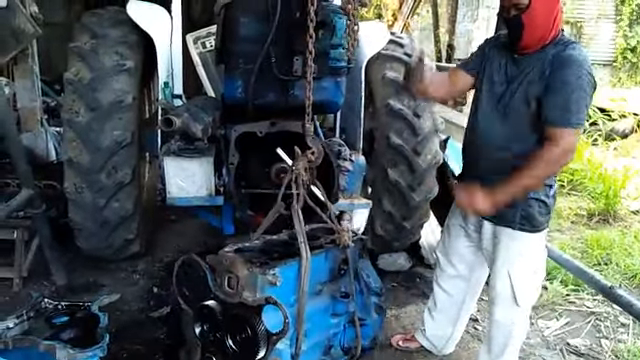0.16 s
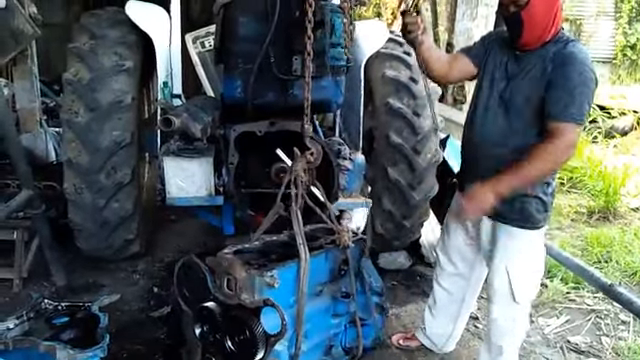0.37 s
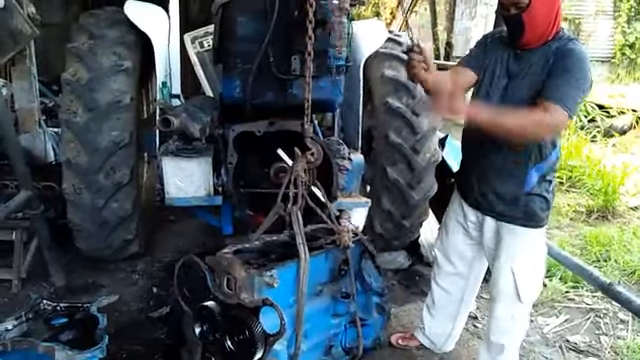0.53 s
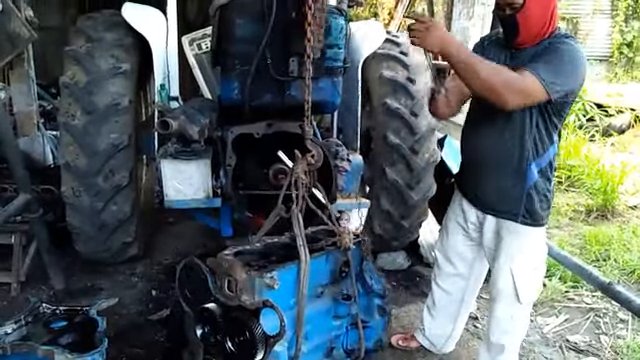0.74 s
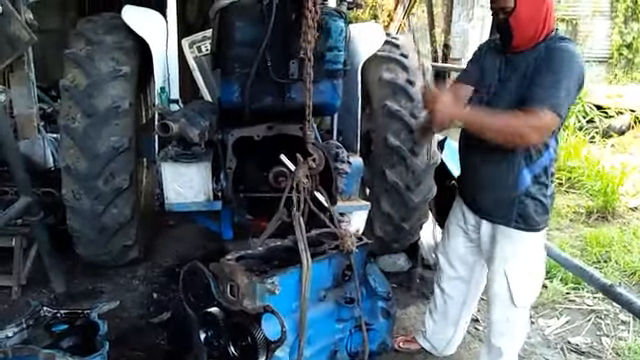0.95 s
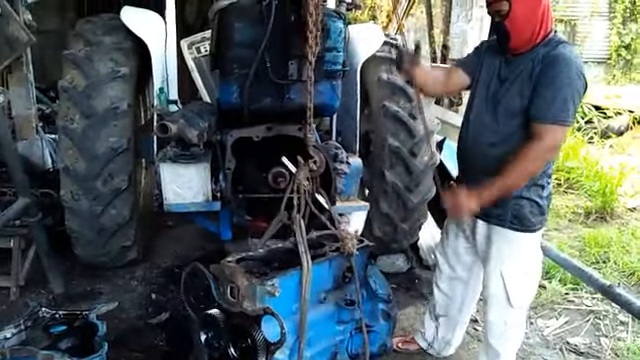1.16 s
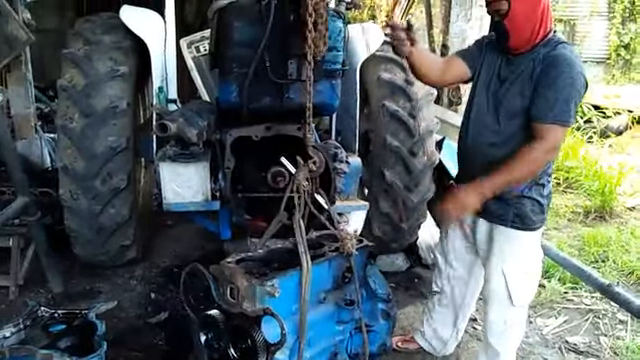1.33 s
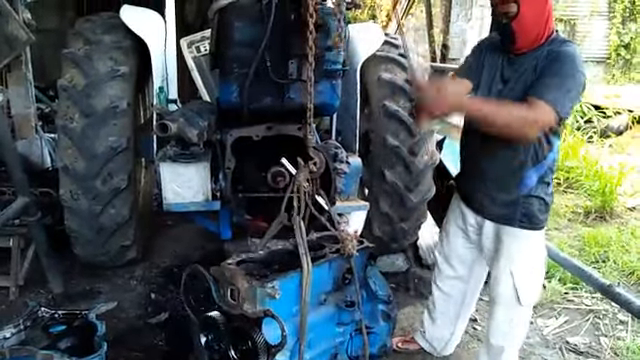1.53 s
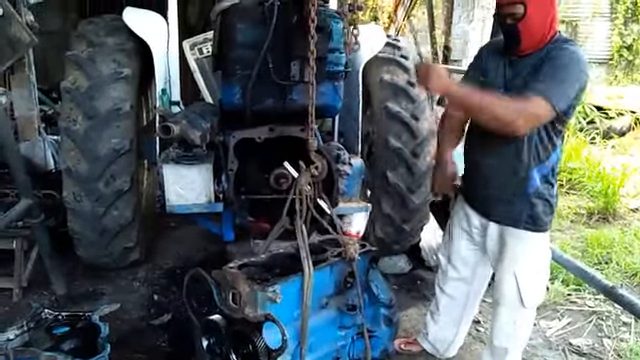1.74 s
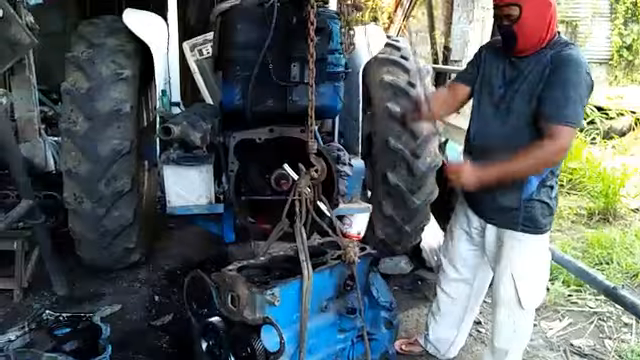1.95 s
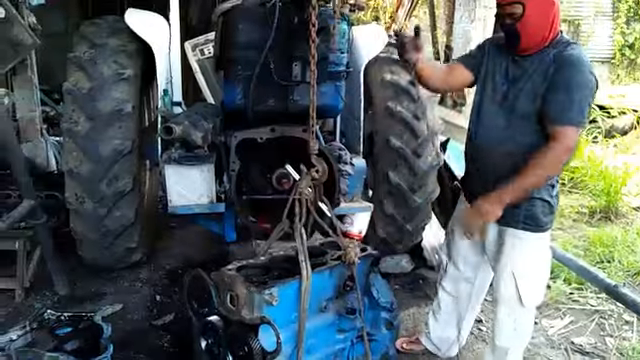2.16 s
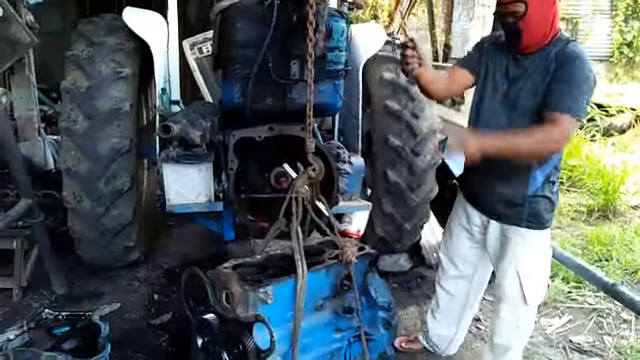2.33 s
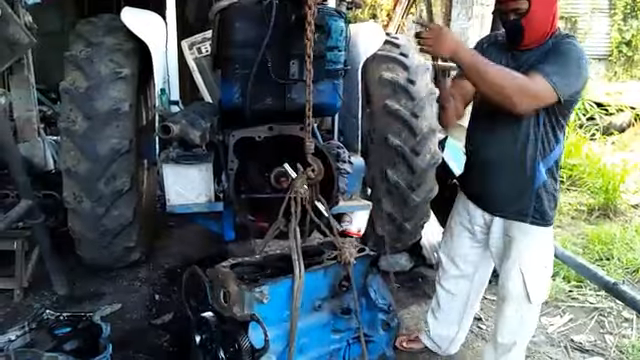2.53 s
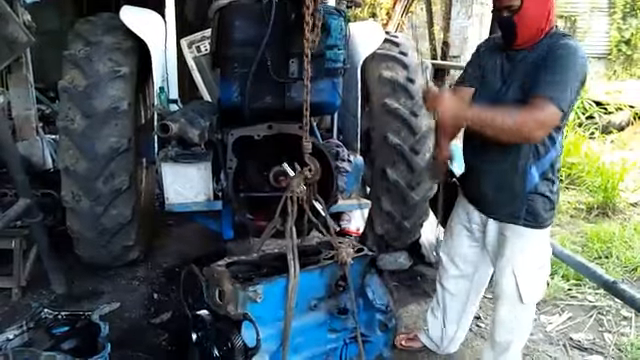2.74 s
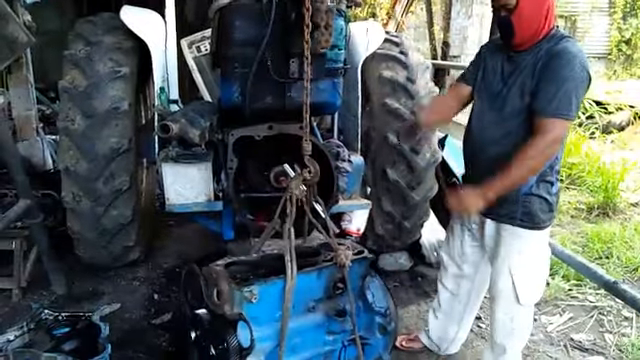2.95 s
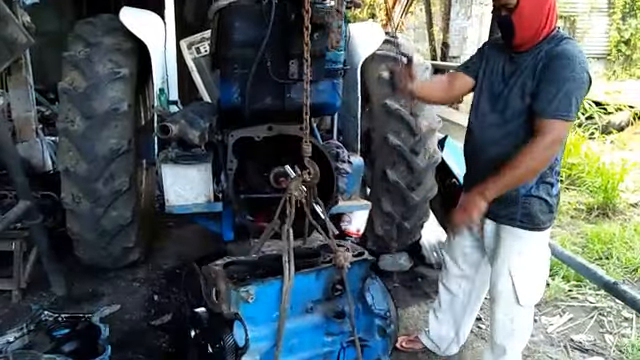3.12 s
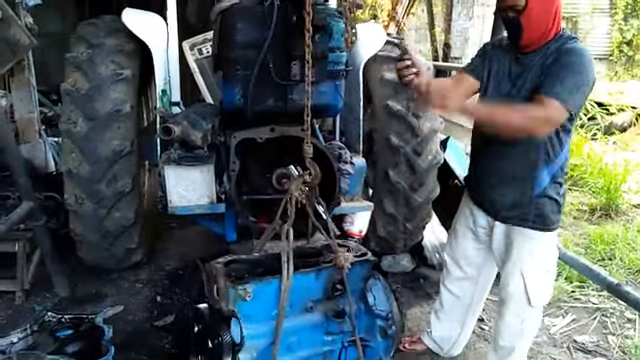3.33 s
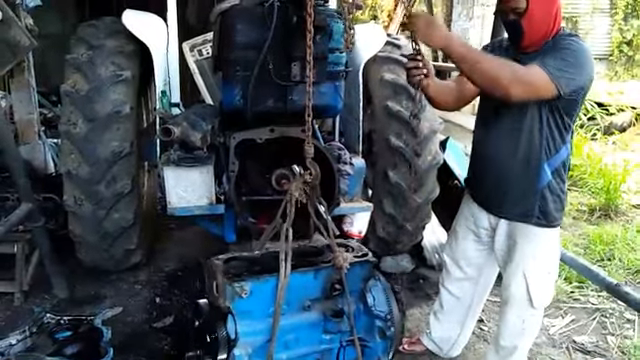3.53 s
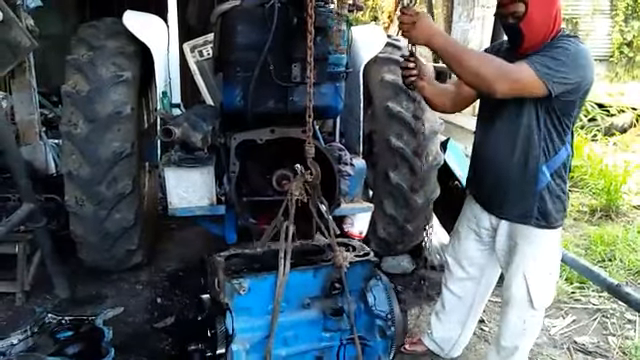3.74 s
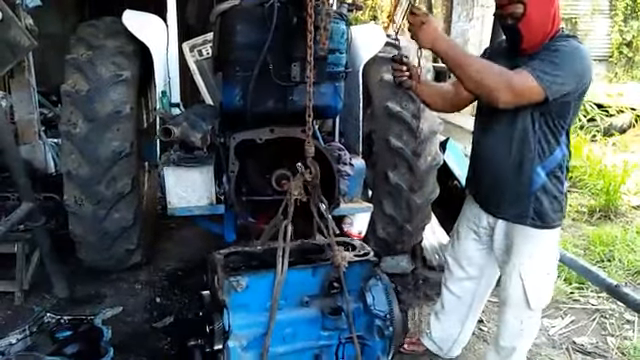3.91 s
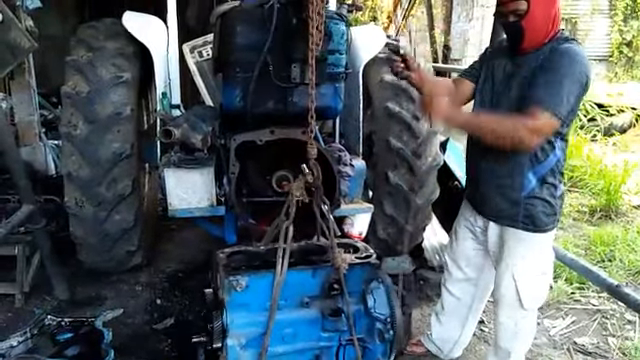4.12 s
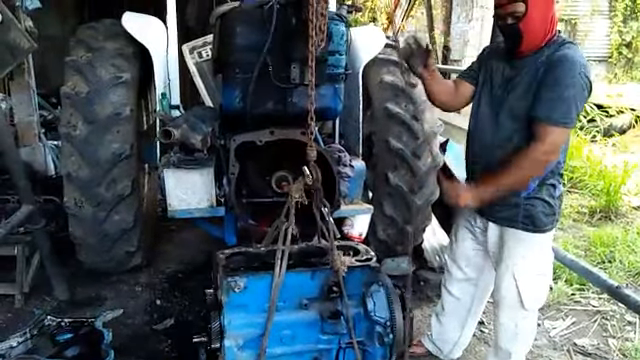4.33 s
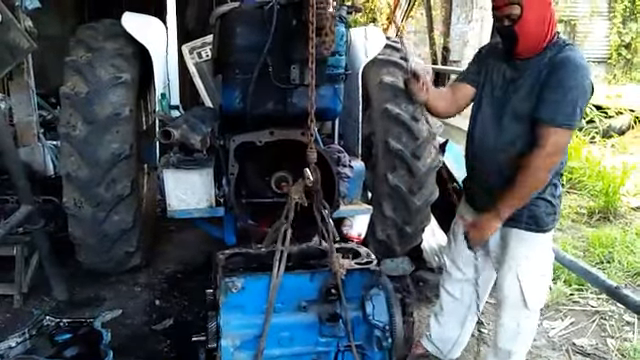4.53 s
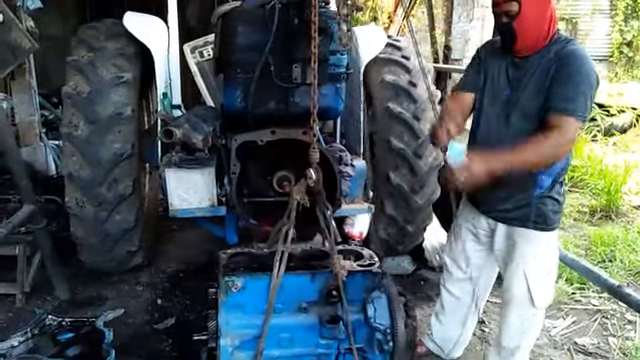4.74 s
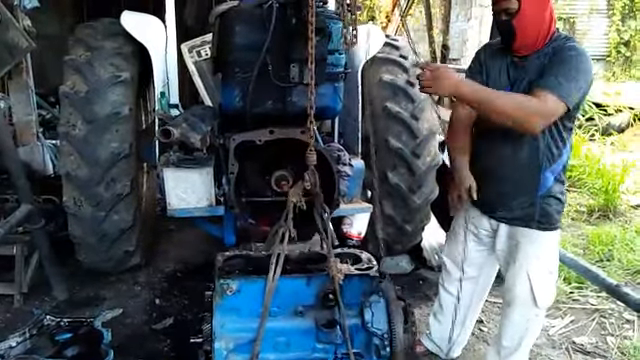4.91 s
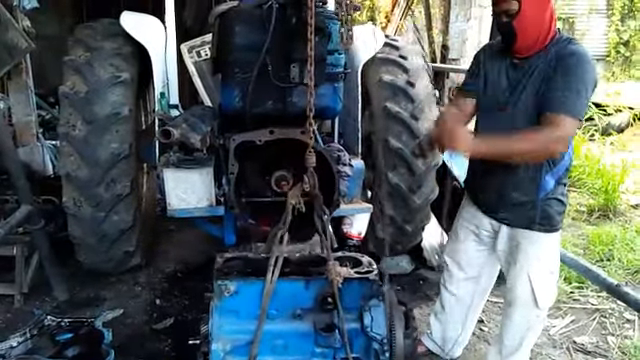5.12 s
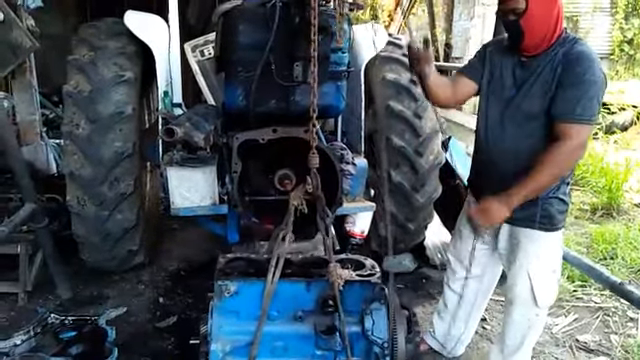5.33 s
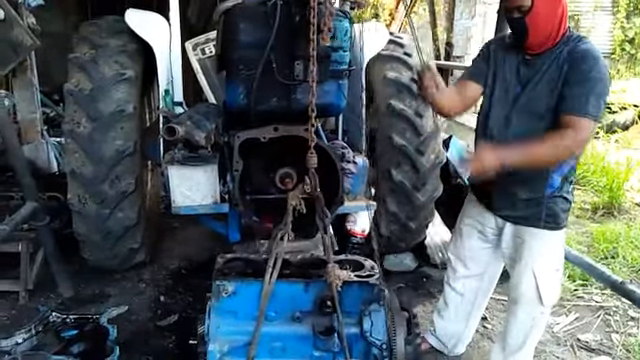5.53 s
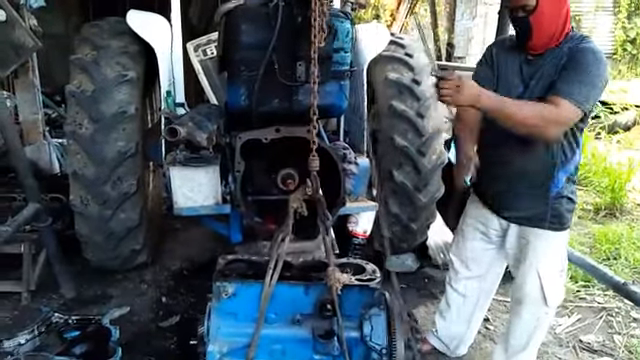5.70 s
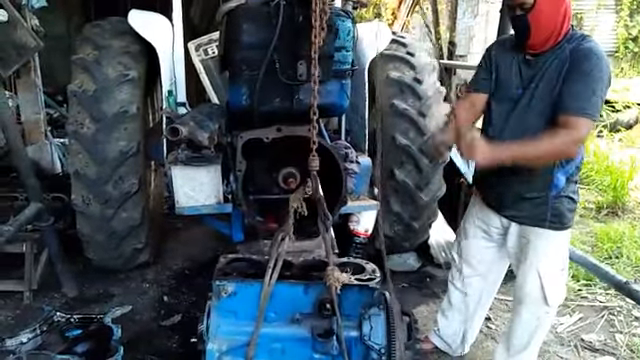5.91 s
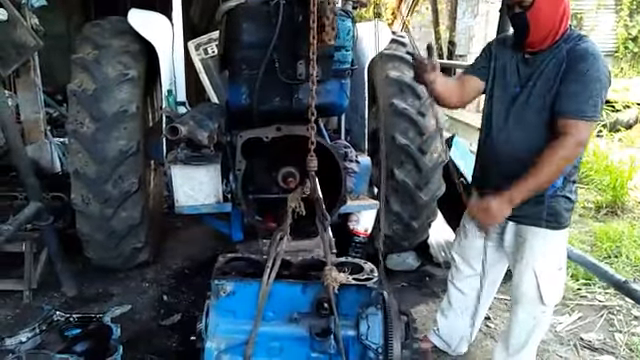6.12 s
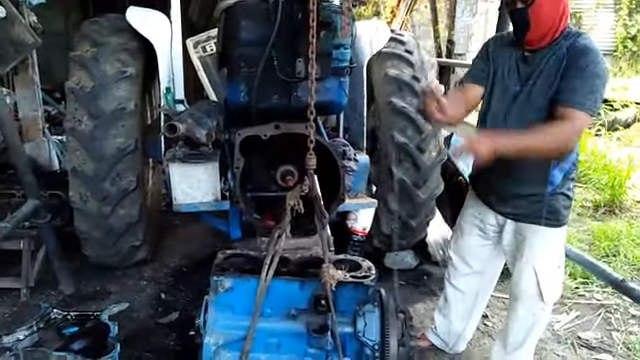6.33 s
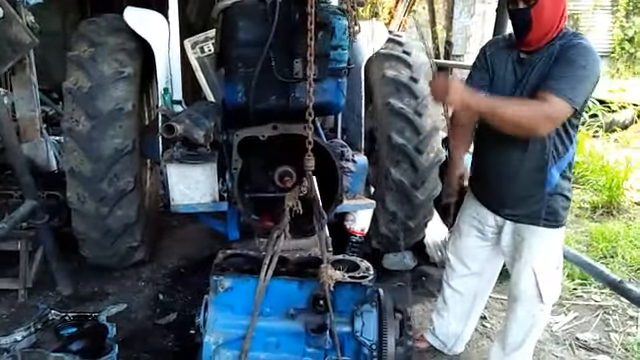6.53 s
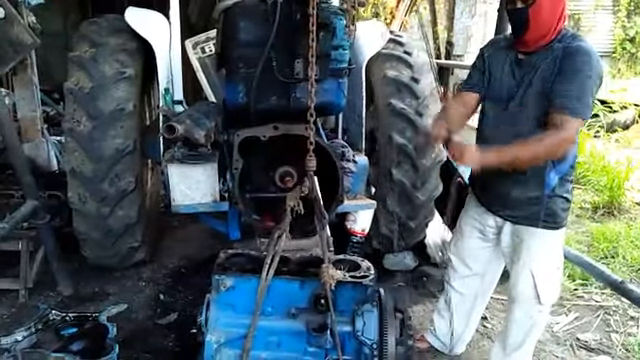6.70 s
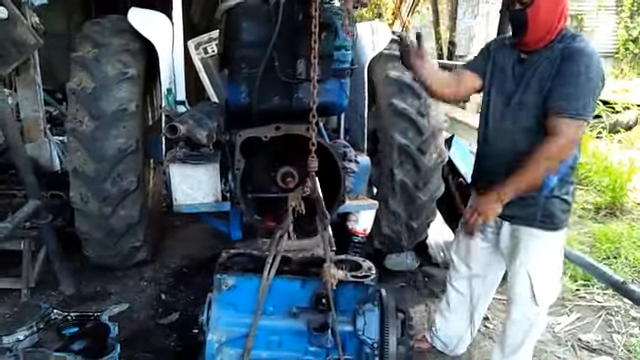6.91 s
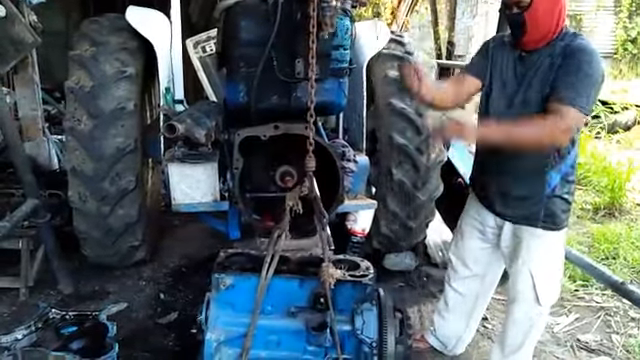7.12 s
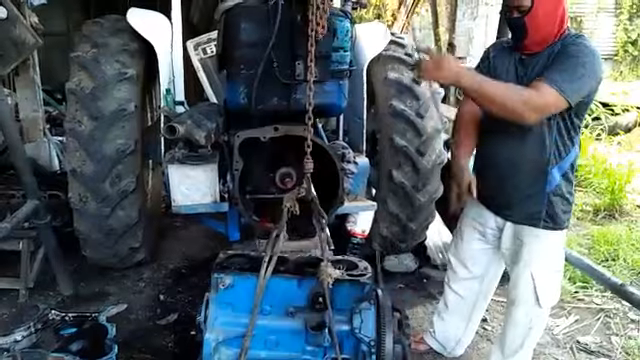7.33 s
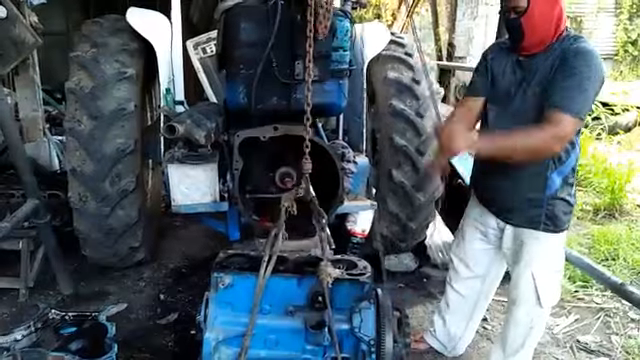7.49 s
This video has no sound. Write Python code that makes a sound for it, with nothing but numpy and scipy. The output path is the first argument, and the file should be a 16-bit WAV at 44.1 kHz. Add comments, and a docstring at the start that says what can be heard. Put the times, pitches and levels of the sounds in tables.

```python
"""Hand chain hoist under an open shed roof

A hand chain is hauled in short pulls over a hoist's pocket wheel. Links knock on wheel and guard: clicks
ring clear steel modes, and noise bands that jump and die stand for the crowded ones. Between knocks the
slack jingles as random touches ring many pitches. Feedback delays give the shed's brief answer, noise
bursts the dull thuds, and swelling noise bands the low rumble of the distant yard."""
import sys
import numpy as np
from scipy import signal
from scipy.fft import rfft, irfft, next_fast_len
from scipy.io import wavfile

SR = 44100
rng = np.random.default_rng(int(sys.argv[2]) if len(sys.argv) > 2 else 0)


def master(y):
    """Save y as 16-bit WAV."""
    cut = np.clip(np.atleast_2d(y).T, -1, 1)
    pcm = np.round(cut * 32767)  # scale
    wavfile.write(sys.argv[1], SR, pcm.astype(np.int16))


N = 333396


def from_db(db):
    """Decibels to gain."""
    return 10 ** (np.asarray(db) / 20)


def rms_one(x):
    """Scale to rms 1."""
    return x / np.sqrt(np.mean(x ** 2) + 1e-20)


def in_time(rows):
    """Columns of a curve over time, one value a sample."""
    s, *columns = np.transpose(rows)
    return [np.interp(np.arange(N) / SR, s, column) for column in columns]


def at_hz(points, hz):
    """All columns of a table at one frequency, joined by straight lines over log frequency."""
    points = np.array(points, float)
    return [np.interp(np.log(hz), np.log(points[:, 0]), column) for column in points[:, 1:].T]


def drift(rate):
    """Random curve: knots of spread 1, about rate of them a second, joined by straight lines."""
    knots = rng.standard_normal(int(rate * N / SR) + 2)
    return np.interp(np.arange(N) * rate / SR, np.arange(len(knots)), knots)


def noise_bands(edges):
    """Yields centre and rms 1 noise of each band; neighbours are unrelated."""
    white = rng.standard_normal((2, N))
    for k, (low, high) in enumerate(zip(edges, edges[1:])):
        sos = signal.butter(2, [low, high], "band", fs=SR, output="sos")
        yield np.sqrt(low * high), rms_one(signal.sosfilt(sos, white[k % 2]))


def ring(clicks, hz, t60):
    """A unit click sets a decaying sine of height 1 ringing."""
    r = from_db(-60 / (t60 * SR))
    w = 2 * np.pi * hz / SR
    return signal.lfilter([0, np.sin(w)], [1, -2 * r * np.cos(w), r * r], clicks + 1e-18)


def dying(power, t60):
    """Energy that jumps with each click and fades by 60 dB in t60."""
    return signal.lfilter([1], [1, -from_db(-120 / (t60 * SR))], power + 1e-18)


# Colour of the distant yard, relative: (frequency [Hz], density [dB per Hz])
YARD_COLOUR = [(30, -29.5), (45, -0.5), (100, -3), (160, -10.5), (210, -21.5), (350, -18.5), (450, -22),
               (880, -31.5), (3000, -37.5), (4200, -48.5), (14000, -32.5)]
# Rumble of the yard as a whole: (time [s], level [dB])
YARD_LEVEL = [(0.0, -54.5), (1.43, -55.5), (1.52, -53), (2.53, -63), (2.97, -53.5), (3.24, -61),
              (3.62, -54.5), (4.02, -58.5), (4.4, -51), (4.61, -58), (6.86, -57), (7.03, -57),
              (7.48, -67.5), (7.56, -63)]
YARD_SWELL_DB, YARD_SWELLS_PER_S = 5.5, 2.3


def yard():
    """Distant rumble, each band swelling on its own, with a faint hiss above it."""
    air = 0
    for hz, band in noise_bands(np.geomspace(22, 15500, num=22)):
        density_db = at_hz(YARD_COLOUR, hz)[0] + YARD_SWELL_DB * drift(YARD_SWELLS_PER_S)
        air = air + from_db(density_db) * np.sqrt(hz) * band  # bandwidth grows with pitch
    return from_db(in_time(YARD_LEVEL)[0]) * rms_one(air)


# Swing of the slack chain before the knocks shake it: (time [s], jingle level [dB])
SLACK_SWING = [(0.0, -31.5), (0.55, -44), (1.12, -43.5), (1.28, -43), (1.73, -41.5), (2.04, -28),
               (2.15, -31), (2.33, -72), (2.55, -72.5), (2.86, -31), (3.05, -37), (3.7, -56.5), (3.87, -70),
               (4.12, -68), (4.36, -55), (4.86, -47), (5.47, -41.5), (6.25, -43), (6.91, -35.5),
               (7.05, -50), (7.33, -57), (7.56, -13)]
# Colour of the jingle, relative: (frequency [Hz], level [dB])
JINGLE_COLOUR = [(600, -3), (900, -10.5), (1500, -21.5), (2800, -2), (4600, 6.5), (7500, 3), (9500, 4.5),
                 (14000, 3.5)]
TOUCHES_PER_S, TOUCH_SPREAD_DB = 700, 5
JINGLE_CYCLES = 66  # cycles in the t60 of a 1 kHz pitch; their number grows with the root of pitch
LOW_JINGLE_DB = -4  # gain of the pitches below the links' band
SHAKE_DB, SHAKE_T60_S = -23.5, 0.48  # each knock shakes the slack, which settles again


def slack_chain():
    """Loose links touch at random, more loudly after a knock; each touch rings many link pitches unevenly."""
    links_from_hz = PART_HZ[3]
    shaken = from_db(2 * SHAKE_DB) * dying(blows(links_from_hz, 0, 0, 1) ** 2, SHAKE_T60_S)
    swing = np.sqrt(from_db(2 * in_time(SLACK_SWING)[0]) + shaken)
    strengths = from_db(TOUCH_SPREAD_DB * np.minimum(rng.exponential(1, N), 4))
    touches = strengths * (rng.random(N) < TOUCHES_PER_S / SR)
    at = np.flatnonzero(touches)
    low, high = 0, 0
    detune = from_db(.15 * rng.standard_normal(64))
    for hz in np.geomspace(700, 14400, num=64) * detune:
        clicks = np.zeros(N)
        clicks[at] = touches[at] * rng.standard_normal(len(at))
        rung = rms_one(ring(clicks, hz, JINGLE_CYCLES / np.sqrt(hz * 1000)))
        rung = from_db(at_hz(JINGLE_COLOUR, hz)[0]) * rung
        if hz < links_from_hz:
            low = low + rung
        else:
            high = high + rung
    scale = np.sqrt(np.mean(high ** 2))
    return swing * (high + from_db(LOW_JINGLE_DB) * low) / scale


# Knocks on wheel and guard: (time [s], link level [dB], then housing, guard and tick [dB against the link],
# favoured low pitch [Hz], favoured high pitch [Hz])
KNOCKS = [(0.0024, -11, -20, -16.5, -7, 3020, 5190), (0.0134, -13, -11.5, -9, -11, 740, 5580),
          (0.1226, -24, -11, -13, -3.5, 910, 5210), (0.1674, -33, -16, -24, 6, 940, 5030),
          (0.2094, -36, -26, -22, -4, 935, 4800), (0.2369, -16, -17, -16, -5.5, 738, 5200),
          (0.2778, -25, -16, -25, -19, 740, 4970), (0.302, -21, -22, -20, -19, 1230, 4300),
          (0.3661, -28.5, 1.5, -6.5, 0, 777, 4310), (0.409, -19.5, -15, -8, -8.5, 745, 5200),
          (0.4449, -22.5, -30, -22, -6, 870, 5140), (0.4614, -7, -15, -18, -10, 750, 5200),
          (0.5671, -33.5, -6, 0.5, -28, 745, 5200), (0.61, -20, -22, -14, -6.5, 2690, 5200),
          (0.6254, -21.5, -12, -5.5, -3, 758, 5590), (0.6629, -17, -16, -13, -7, 2270, 5540),
          (0.6858, -9.5, -12, -14, -6.5, 2370, 5200), (0.7143, 1.5, -19, -19, -7.5, 756, 5110),
          (0.7264, -16, -42, -10, -20, 717, 4600), (0.8253, -12.5, -12.5, -9.5, -18, 2200, 4450),
          (0.9183, -17.5, -15, -18, -33, 927, 3830), (1.0714, -28.5, 5.5, 3, -4, 1050, 4530),
          (1.0819, -20.5, -9, -12, -4.5, 740, 5200), (1.1, -8.5, -32, -14.5, -14.5, 1400, 4420),
          (1.1767, -20, -25, -41, -11, 740, 5000), (1.2077, -11.5, -28, -26, -9.5, 1210, 4900),
          (1.278, -19.5, -25, -20, -10, 740, 5200), (1.3309, -25.5, -21, -26, -3, 877, 4240),
          (1.3728, -13.5, -23, -27, -11.5, 2700, 5200), (1.3864, -14, -19, -20, -11, 776, 4300),
          (1.4037, -12.5, -19, -12, -10, 740, 5210), (1.4476, -22, -20, -24, -4, 896, 4270),
          (1.4699, -11, -14, -14.5, -9.5, 749, 5200), (1.4814, -17.5, -27, -26, -5.5, 737, 5580),
          (1.513, -20.5, -33, -11.5, -8, 2540, 5170), (1.5394, -26.5, -23, -11, -3, 2530, 5200),
          (1.6082, -22.5, -16, -13.5, -3, 2680, 5500), (1.6754, -16, -14.5, -13, -9.5, 2270, 5500),
          (1.7679, -23, -37, -24, -4, 2720, 4270), (1.7938, -13.5, -20, -11, -5.5, 742, 5150),
          (1.8532, -6.5, -24, -15, -9.5, 2310, 4820), (1.9953, -24, -13, -6, -10, 2460, 5630),
          (2.0243, -9, -14, -12.5, -4.5, 758, 5200), (2.057, -16.5, -22, -15.5, -12, 2140, 5210),
          (2.1545, -11.5, -18, -14, -3.5, 2200, 5450), (2.1624, -6.5, -31, -12.5, -9, 764, 5200),
          (2.1724, -5, -11.5, -12, -5.5, 760, 5200), (2.5142, -41, -30, -29, -4, 890, 4910),
          (2.5474, -42.5, -33, -25, 5, 754, 5570), (2.5735, -28, -34, -41, -18, 982, 5340),
          (2.5995, -29, -32, -35, -19, 2820, 4940), (2.61, -24.5, -19, -23, -5, 720, 4980),
          (2.674, -24.5, -47, -43, -20, 820, 4760), (2.7036, -16.5, -21, -22, -17, 1010, 5400),
          (2.7263, -12.5, -11.5, -18, -11, 2140, 4630), (2.7607, -15, -17.5, -12, -6, 2800, 5500),
          (2.798, -8, -38, -16, -13, 2070, 3990), (2.8379, -13, -27, -21, -13, 2130, 4940),
          (2.871, -15.5, -11.5, -12, -17, 740, 4660), (2.8863, -8.5, -29, -14.5, -10, 780, 5340),
          (2.9168, -5.5, -22, -15, -6.5, 719, 5740), (2.9467, -8, -22.5, -13, -8, 738, 5280),
          (3.05, -9.5, -14, -19.5, -7, 2130, 4620), (3.0824, -11.5, -16, -17.5, -16, 2216, 5230),
          (3.1388, -15, -15, -16, -9, 2167, 5210), (3.1635, -7.5, -21, -13, -14, 908, 4900),
          (3.1936, -7, -14, -17.5, -7.5, 736, 4070), (3.3076, -19, -39, -31, -14, 930, 4920),
          (3.3618, -16, -18, -23, -16, 790, 4100), (3.4284, -24, -29, -14, -10, 1720, 4070),
          (3.5464, -31, -41, -13, 0, 1650, 5740), (3.5575, -19.5, -47, -14, -11.5, 1740, 4180),
          (3.6384, -37.5, -36, -0.5, -5, 1680, 4440), (3.6784, -23, -48, -14.5, -11, 1510, 4330),
          (3.7604, -33, -33, -16, -0.5, 1400, 4320), (3.8192, -33.5, -26.5, -16, -7, 1870, 3900),
          (4.0432, -43, -18, -29, -15.5, 1220, 4950), (4.1022, -31.5, -20.5, -22, -15, 932, 5600),
          (4.1746, -20, -16, -18.5, -14, 2540, 5060), (4.2108, -25.5, -21, -17, -9, 1240, 4300),
          (4.2425, -9.5, -23.5, -21.5, -9, 862, 5500), (4.2916, -17, -24, -14.5, -10, 877, 5060),
          (4.3261, -19.5, -17, -22, -15, 856, 4240), (4.3655, -21, -13.5, -9, -12, 913, 4460),
          (4.3964, -25, -26, -23, -18, 934, 4940), (4.4151, -14, -21, -18, -7, 764, 4590),
          (4.4434, -7, -18, -16.5, -11.5, 763, 4700), (4.4713, -10, -14, -12.5, -6.5, 743, 4650),
          (4.5166, -18, -25, -19, -8, 710, 4300), (4.5314, -9, -23, -25, -10.5, 913, 4440),
          (4.624, -24.5, -29, -38, -10, 925, 4190), (4.6575, -22.5, -38, -44, -18, 918, 4490),
          (4.6783, -28.5, -41, -41, -4, 918, 4300), (4.779, -20, -14.5, -20.5, -9.5, 2030, 5140),
          (4.8499, -23.5, -23, -22, -21, 810, 4470), (4.9472, -25, -30, -38, -16, 2860, 4270),
          (4.9741, -17.5, -23, -32, -17, 990, 4550), (5.0236, -15, -10, -18.5, -9, 2177, 5590),
          (5.125, -24, -27, -33, -30, 920, 4280), (5.1735, -21.5, -30, -16, -11, 2540, 4620),
          (5.221, -21, -9, -16, -17, 2270, 5200), (5.249, -8, -17.5, -9.5, -15, 1090, 3270),
          (5.2824, -7.5, -15, -9, -11, 1213, 4360), (5.3602, -23, -5, 0, -24, 2450, 4340),
          (5.3797, -18, -8, -8, -21, 927, 5100), (5.4113, -10, -17, -10, -17, 897, 4160),
          (5.4575, -17, -30, -22, -12, 838, 4140), (5.4804, -10.5, -32, -4.5, -19, 1420, 4400),
          (5.5189, -6, -14.5, -7, -18, 2700, 4650), (5.5324, -10, -10, -8.5, -18, 1810, 4030),
          (5.5434, -7.5, -16, -8.5, -23, 2650, 4600), (5.6691, -13, -17.5, -19.5, -11.5, 2640, 4760),
          (5.7084, -20.5, -16, -12.5, -13, 770, 4330), (5.7354, -19.5, -19, -24, -13, 1230, 5380),
          (5.8144, -27.5, -17, -7, -10, 1650, 4320), (5.8424, -17, -31, -13, -10, 1520, 4140),
          (5.8623, -17.5, -22, -13, -7, 1680, 4310), (5.8765, -11, -18, -16, -11.5, 740, 5580),
          (5.909, -10.5, -18, -12, -7.5, 2070, 5580), (5.9464, -12, -18.5, -18.5, -13, 2540, 3860),
          (6.0254, -21, -12, -10, -8.5, 896, 4440), (6.0774, -20, -11, -13, -18, 912, 4420),
          (6.2107, -22, -8.5, -5.5, -11, 912, 4350), (6.2228, -14, -21, -18, -18, 751, 5160),
          (6.2846, -14, -22.5, -23, -23, 936, 4960), (6.2976, -10, -22, -17.5, -3.5, 2180, 5210),
          (6.3305, -20, -18.5, -11, -15, 738, 4300), (6.4198, -32.5, -4, -9, 2, 760, 5210),
          (6.4334, -30.5, -20, -8.5, -12, 2130, 5580), (6.4858, -15, -18, -11, -11.5, 736, 5350),
          (6.5326, -15, -12, -13, -6.5, 729, 4320), (6.7014, -23, -17, -1.5, 0.5, 1650, 4170),
          (6.7324, -19, -12.5, -9.5, -4.5, 2760, 3590), (6.7421, -8, -20, -15.5, -19, 1890, 4320),
          (6.8014, -13.5, -19.5, -16, -14, 870, 4060), (6.8514, -24.5, -22, -1.5, -5, 1700, 4330),
          (6.9117, -14.5, -10, -11.5, -6, 766, 4580), (6.953, -31, -25, -16, -28, 910, 5400),
          (6.9665, -6, -30.5, -23.5, -14, 740, 5360), (7.1357, -44, -17, -17, -11, 870, 4330),
          (7.1557, -41.5, -2.5, -5, 1, 918, 4200), (7.1896, -41, 0, -3, -0.5, 890, 5590),
          (7.2564, -33, -33, -30, 1.5, 902, 5070), (7.2709, -21, -37, -38, -16, 884, 4340),
          (7.3352, -28, -27, -35, -13, 977, 4900), (7.3736, -24.5, -21, -34, -1.5, 885, 5040),
          (7.3941, -17.5, -27, -40, -12, 870, 4740), (7.418, -22.5, -26.5, -37, -8, 910, 4830),
          (7.448, -13.5, -24, -32, -12, 894, 4840), (7.4654, -8.5, -18.5, -24.5, -15, 880, 4830),
          (7.4964, -9.5, -37, -13.5, -14, 2540, 3920), (7.5484, -12, -8.5, -10, -12, 738, 4640)]
# Band limits [Hz]: housing below the first, then guard, links, and tick above the last; they blend between
PART_HZ = [1080, 1200, 3000, 3350, 6800, 7700]


def blows(hz, spread_db, favour_db, width):
    """Click train of the knocks as felt at one frequency; the place struck favours two pitches."""
    s, link, housing, guard, tick, *pitches = np.transpose(KNOCKS)
    share = [np.interp(np.log(hz), np.log(PART_HZ), part) for part in np.eye(4)[:, [0, 1, 1, 2, 2, 3]]]
    part_db = share @ np.array([housing, guard, 0 * link, tick])
    near = np.exp(-(np.log(hz / np.array(pitches)) / width) ** 2).max(axis=0)
    level_db = link + part_db + favour_db * near + spread_db * rng.standard_normal(len(s))
    clicks = np.zeros(N)
    clicks[np.clip((s * SR).astype(int), 0, N - 1)] = from_db(level_db)
    return clicks


# Pitches of the clear steel modes: (frequency [Hz])
STEEL_HZ = [739, 810, 880, 912, 1050, 1233, 1380, 1680, 1890, 2133, 2270, 2540, 2760, 3206, 3870, 3962,
            4240, 4321, 4610, 5040, 5204, 5330, 5580, 6800, 9215]
# The same modes in order: (level before STEEL_DB [dB], t60 [s])
STEEL_RING = [(4, 0.2), (-11.5, 0.67), (-2.5, 0.15), (5, 0.13), (-22, 0.06), (-2, 0.16), (1.5, 0.05),
              (-11, 0.19), (-22.5, 0.14), (-1.5, 0.19), (-9.5, 0.12), (-3.5, 0.14), (-1, 0.21),
              (-16.5, 0.05), (-33, 0.077), (-14.5, 0.14), (-14.5, 0.28), (-10, 0.087), (-35.5, 0.063),
              (-31.5, 0.064), (-6.5, 0.072), (-16.5, 0.074), (-13, 0.076), (-8.5, 0.055), (-15.5, 0.1)]
STEEL_DB, STRIKE_SPREAD_DB, CONTACT_T60_S = -10, 3.5, 0.04
FAVOUR_DB, FAVOUR_WIDTH = 12.5, .03  # lift next to a favoured pitch, and its reach in log frequency
WOBBLE_DB, WOBBLE_PER_S = 3.2, 90  # links dragging on the steel make its ring flutter


def clear_modes():
    """Housing and links ring on a few lasting pitches; a link seats with a tap and a short rough scuff."""
    out = 0
    scuff = rng.standard_normal(N) / np.sqrt(CONTACT_T60_S * SR / (2 * np.log(1000)))
    for hz, (level_db, t60) in zip(STEEL_HZ, STEEL_RING):
        taps = blows(hz, STRIKE_SPREAD_DB, FAVOUR_DB, FAVOUR_WIDTH)
        force = 0.49 * taps + 0.42 * scuff * np.sqrt(dying(taps ** 2, CONTACT_T60_S))
        flutter_db = WOBBLE_DB * drift(WOBBLE_PER_S)
        out = out + from_db(level_db + STEEL_DB + flutter_db) * ring(force, hz, t60)
    return out


# The crowd of close modes:
# (frequency [Hz], level [dB], quick t60 [s], slow t60 [s], slow slope against the quick [dB])
CROWD = [(610, -40.5, 0.031, 0.12, 4.5), (780, -19, 0.07, 0.38, -6.5), (1240, -24.5, 0.034, 0.38, -2),
         (2380, -11.5, 0.06, 0.26, -11), (3490, -22, 0.023, 0.11, -7), (4470, -22, 0.04, 0.28, -6.5),
         (7500, -19, 0.043, 0.16, -10), (8940, -0.5, 0.036, 0.27, -15.5), (12240, -8.5, 0.0067, 0.088, -7),
         (13900, -2, 0.0083, 0.12, -8)]
CROWD_SPREAD_DB, CROWD_FAVOUR_DB, CROWD_FAVOUR_WIDTH = 1.8, 8, .16  # favours more broadly
CRACK_DB, CRACK_T60_S = -2, 0.0023  # first instant over the quick slope, dB per octave above the guard


def crowd_modes():
    """Modes too many to tell apart: noise bands whose energy jumps at a knock and dies in three slopes."""
    out = 0
    for hz, band in noise_bands(np.geomspace(560, 15500, num=32)):
        level_db, quick_t60, slow_t60, slow_db = at_hz(CROWD, hz)
        power = blows(hz, CROWD_SPREAD_DB, CROWD_FAVOUR_DB, CROWD_FAVOUR_WIDTH) ** 2
        crack = from_db(2 * CRACK_DB * np.log2(hz / PART_HZ[2])) * dying(power, CRACK_T60_S)
        slow = from_db(2 * slow_db) * dying(power, slow_t60)
        energy = crack + dying(power, quick_t60) + slow
        rise = np.exp(-2 * np.pi * min(hz / 14, 250) / SR)  # low parts take longer to speak
        out = out + from_db(level_db) * band * np.sqrt(signal.lfilter([1 - rise], [1, -rise], energy))
    return out


SHED_T60_S, SHED_DB, SHED_CUT_HZ = 0.39, -20.5, 2100  # t60 is that of the lows


def shed(x):
    """The roof's answer: ten feedback delays, duller on every round, evaluated in frequency."""
    size = next_fast_len(N + SR)
    hz = np.arange(size // 2 + 1) * SR / size
    dull = 1 / np.sqrt(1 + (hz / SHED_CUT_HZ) ** 2)
    answer = 0
    for k, lag in enumerate(rng.uniform(0.0073, 0.067, 10)):
        loop = from_db(-60 * lag / SHED_T60_S) * dull ** .3 * np.exp(-2j * np.pi * hz * lag)
        answer = answer + (-1) ** k * loop / (1 - loop)
    return irfft(rfft(x, size) * answer, size)[:N]


# Heavy knocks that shake the roof beam: (time [s], peak level [dB], pitch [Hz], t60 [s])
THUDS = [(0.708, -30.5, 306, 0.077), (1.1, -41, 510, .08), (2.157, -43, 348, .05),
         (2.175, -37.5, 450, 0.19), (2.914, -47, 350, 0.12), (5.248, -37, 550, 0.058),
         (5.525, -32, 560, 0.37), (6.295, -38.5, 323, 0.013), (6.965, -47, 310, 0.022)]
THUD_SPAN = 1.255  # a thud reaches from its pitch over this ratio to its pitch times it


def thuds():
    """A dull low burst of dying, band-limited noise under the heavy knocks."""
    out = np.zeros(N + SR)
    t = np.arange(SR // 2) / SR
    for s, peak_db, hz, t60 in THUDS:
        burst = rng.standard_normal(len(t)) * from_db(-60 * t / t60)
        sos = signal.butter(2, [hz / THUD_SPAN, hz * THUD_SPAN], "band", fs=SR, output="sos")
        burst = signal.sosfilt(sos, burst)
        start = int(s * SR)
        out[start:start + len(t)] += from_db(peak_db) * burst / np.abs(burst).max()
    return out[:N]


HOIST_LOW_HZ = 707  # the small steel parts radiate little below this


def scene():
    """Hoist and thuds, their echo in the shed, and the yard."""
    steel = slack_chain() + clear_modes() + crowd_modes()
    low_cut = signal.butter(6, HOIST_LOW_HZ, "high", fs=SR, output="sos")
    hoist = signal.sosfilt(low_cut, steel) + thuds()
    return (yard() + hoist + from_db(SHED_DB) * shed(hoist))[None]


OVERLOAD, CUTOFF_HZ = .66, 14350  # OVERLOAD is the ceiling of the rounded peaks, full scale 1


def record(dry):
    """At the microphone peaks are rounded; the top is cut steeply, in two steps."""
    rounded = OVERLOAD * np.tanh(dry / OVERLOAD)
    cliff = signal.sosfilt(signal.ellip(9, .5, 22, CUTOFF_HZ, fs=SR, output="sos"), rounded)
    return signal.sosfilt(signal.cheby2(6, 40, 16000, fs=SR, output="sos"), cliff)


dry = scene()
out = record(dry)
master(out)
```